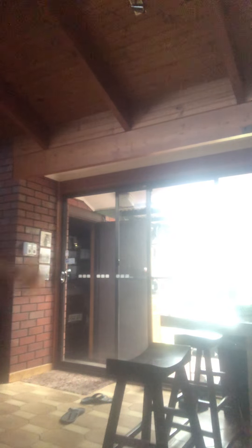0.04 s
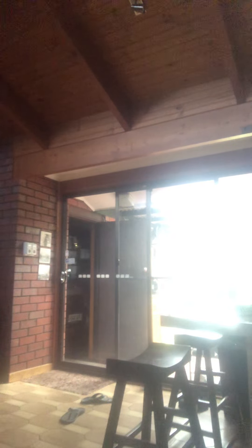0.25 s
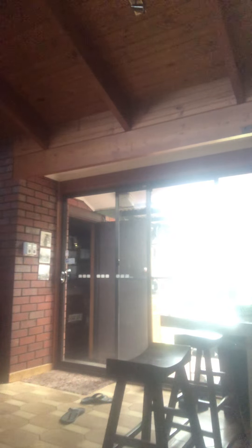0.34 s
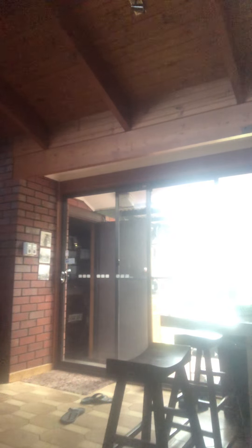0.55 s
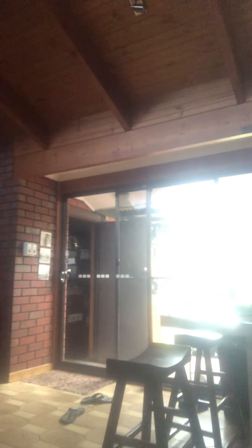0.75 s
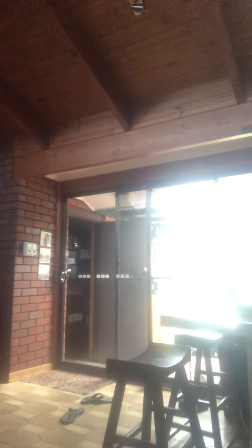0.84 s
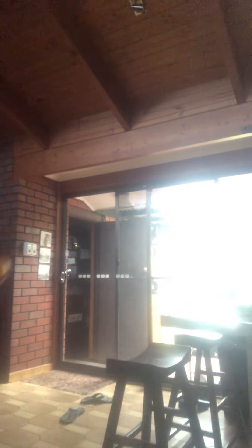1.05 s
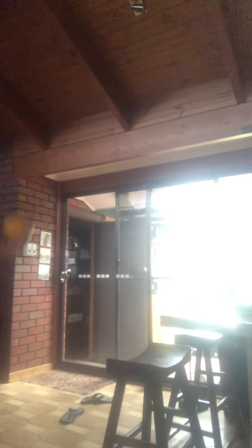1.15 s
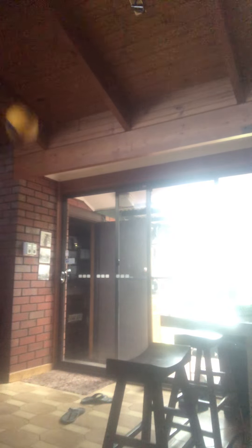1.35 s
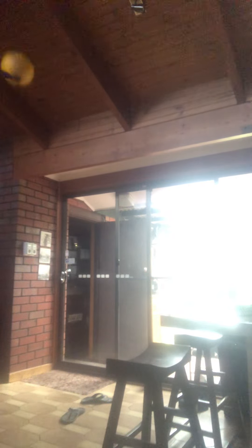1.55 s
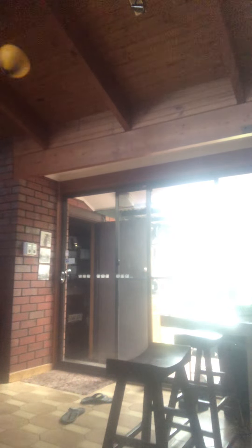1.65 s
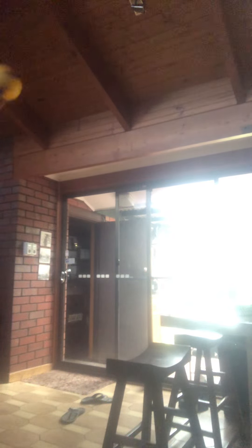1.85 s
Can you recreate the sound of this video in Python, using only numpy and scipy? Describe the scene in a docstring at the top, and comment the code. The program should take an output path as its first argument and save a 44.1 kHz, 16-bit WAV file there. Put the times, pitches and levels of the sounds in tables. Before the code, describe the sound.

A ball smacks once against a hard surface at about 0.2 seconds, over the faint tail of an earlier sound. The sharp slap has a hollow boom just behind it, and both ring through the room for about half a second. From around 0.9 seconds there is only a faint low hum and hiss, with a few barely audible swishes until about 1.4 seconds.

```python
"""Brick and timber room, tiled floor: a ball smacks once against a hard surface.
The contact gives a sharp slap with a brief buzz of the ball's skin. A hollow boom swells just
behind it; ball and room resonances and dense reflections ring for about half a second.
Around it: a low steady hum, air, faint hiss, an earlier sound dying away, tiny ticks, soft swishes."""
import sys
import numpy as np
from scipy import signal
from scipy.fft import rfft, irfft
from scipy.io import wavfile
from scipy.ndimage import uniform_filter1d

SR = 44100
rng = np.random.default_rng(int(sys.argv[2]) if len(sys.argv) > 2 else 0)


def master_out(mix):
    """Clip the mix to full scale and print it as 16-bit PCM to the path in sys.argv[1]."""
    frames = np.transpose(np.atleast_2d(mix))
    ceiling = np.clip(frames, -1, 1)
    pcm = np.round(ceiling * 32767).astype(np.int16)
    wavfile.write(sys.argv[1], SR, pcm)


N = 83790

# hum partials: f/Hz, level/dB
HUM_PARTIALS = [(48.4, -66), (86.1, -58), (172.3, -66), (258.4, -72)]
# still air: f/Hz, density/dB
AIR_SPECTRUM = [(15, -31), (25, -17.5), (60, -8), (110, 1.5), (200, -5.5), (400, -14), (700, -13.5),
                (1700, -23), (2000, -27), (3600, -30.5), (15500, -44)]
# hiss: f/Hz, density/dB
HISS_SPECTRUM = [(1000, -13), (2700, -5), (3300, -12), (3600, 5), (3900, -10.5), (5200, -6), (6500, -23),
                 (12000, -32)]
# hiss envelope: t/s, level/dB
HISS_ENVELOPE = [(0, -68.5), (.85, -68.5), (.98, -76.5), (1.12, -65.5), (1.2, -72), (1.38, -68.5),
                 (1.52, -77.5), (1.66, -75.5), (1.9, -80)]
# tail of an earlier sound: f/Hz, density/dB
TAIL_SPECTRUM = [(30, -13), (90, 4), (200, -13), (450, -12.5), (900, -26.5), (2000, -29.5), (5200, -31),
                 (7000, -46.5), (15000, -59)]
# ticks: t/s, level/dB, centre f/Hz
TICK_EVENTS = [(0.2089, -50.5, 4960), (0.2221, -56, 4830), (1.6030, -58, 4400), (1.6136, -54, 3200)]
# contact crack: f/Hz, level/dB
SLAP_SPECTRUM = [(100, -38.5), (500, -16), (1000, 2), (2500, -0.5), (3200, -5.5), (4200, 2), (5200, 7.5),
                 (6100, -7), (7300, -13), (9000, -24), (15000, -16.5)]
# first reflections of the slap: delay/s, level/dB
SLAP_ECHOES = [(.0089, -17.5), (.0120, -8.5), (.0197, -18.5), (.0277, -17), (.0404, -26.5)]
# ball and room resonances: f/Hz, level/dB
RING_MODES = [(80, -32.5), (110, -24.5), (139, -22), (168, -21.5), (224, -35), (275, -32.5), (303, -30),
              (470, -32), (501, -31.5), (585, -36), (685, -32), (792, -33), (812, -30.5), (1785, -30),
              (2600, -39), (2659, -38), (3277, -37.5), (3639, -38), (3769, -39.5), (4769, -40.5),
              (5400, -40), (5631, -39.5)]
# reverberation: f/Hz, density/dB, T60/s
REVERB_BANDS = [(30, -26.5, 0.16), (59.5, -6.5, .55), (120, 3, .62), (220, -3, 0.66), (370, -13.5, 0.78),
                (750, -13, 0.6), (1202, -17.5, 0.75), (1925, -14.5, 0.57), (3540, -13.5, 0.64),
                (5375, -15, 0.58), (6600, -23, 0.56), (10000, -32.5, 0.45), (15500, -37, .34)]
# swishes: t/s, width/s, level/dB
SWISH_EVENTS = [(.87, 0.058, -62.5), (1.2, 0.019, -60), (1.255, 0.027, -61.5), (1.32, 0.093, -64)]
# swish: f/Hz, density/dB
SWISH_SPECTRUM = [(100, -15), (300, 7.5), (900, 1.5), (1400, -5.5), (2200, -7.5), (3500, -17),
                  (5000, -14.5), (8000, -27), (15000, -32)]

HIT_S = 0.2313


def undb(db):
    """Decibels to gain."""
    return 10 ** (np.asarray(db) / 20)


def lookup(points, hz, column=1):
    """Table column interpolated over log frequency."""
    table = np.array(points, float)
    return np.interp(np.log(np.maximum(hz, 1)), np.log(table[:, 0]), table[:, column])


def noise(spectrum):
    """Coloured noise, unit RMS."""
    gain = undb(lookup(spectrum, np.fft.rfftfreq(N, 1 / SR)))
    x = irfft(rfft(rng.standard_normal(N)) * gain, N)
    return x / x.std()


def click(spectrum, size=2048):
    """Minimum-phase impulse with the given spectrum."""
    gain = undb(lookup(spectrum, np.fft.rfftfreq(size, 1 / SR)))
    cepstrum = irfft(np.log(gain))
    cepstrum[1:size // 2] *= 2
    cepstrum[size // 2 + 1:] = 0
    return irfft(np.exp(rfft(cepstrum)))


def decay(age_s, t60_s):
    """Unity until age zero, then exponential decay."""
    return np.exp(-np.log(1000) * np.maximum(age_s, 0) / t60_s)


def wander(rate_hz):
    """Slow random drift, spread near 1."""
    hold = int(SR / rate_hz)
    steps = np.repeat(rng.standard_normal(N // hold + 1), hold)
    return uniform_filter1d(steps, hold)[:N]


def hum(t, waver_db=0.5):
    """Low partials, each wavering slightly in level."""
    out = np.zeros(N)
    for hz, db in HUM_PARTIALS:
        rms = undb(db + waver_db * wander(rate_hz=3.4))
        out += rms * np.sqrt(2) * np.sin(2 * np.pi * (hz * t + rng.random()))
    return out


def air(t, level_db=-59, waver_db=0.55):
    """Still air, plus a faint hiss that comes and goes."""
    hiss_db = np.interp(t, *np.array(HISS_ENVELOPE).T)
    hiss = noise(HISS_SPECTRUM) * undb(hiss_db)
    return hiss + noise(AIR_SPECTRUM) * undb(level_db + waver_db * wander(rate_hz=5))


def earlier_tail(t, level_db=-41):
    """An earlier sound dying away."""
    return undb(level_db) * noise(TAIL_SPECTRUM) * decay(t, t60_s=1)


def ticks(t, rise_s=0.00044, skirt_db=-17):
    """Tiny dry noise bursts, each with its own brightness."""
    out = np.zeros(N)
    for at_s, db, hz in TICK_EVENTS:
        spectrum = [(hz / 8, -30), (hz / 2, skirt_db / 2), (hz, 0), (6800, skirt_db), (10000, -36)]
        attack = np.clip(1 + (t - at_s) / rise_s, 0, 1)
        out += undb(db) * noise(spectrum) * attack * decay(t - at_s, t60_s=0.008)
    return out


def slap(t, level_db=11.5, skin_db=-4):
    """Contact crack and first echoes, each with a brief buzz of the ball's skin."""
    skin = rng.standard_normal(N) * decay(t, t60_s=0.012)
    skin *= undb(skin_db) / np.linalg.norm(skin)
    skin[0] = 1  # contact impulse
    crack = signal.fftconvolve(skin, click(SLAP_SPECTRUM))
    direct = (0.00053, 0.0043)  # delay/s, level/dB
    arrivals = np.zeros(N)
    for delay_s, db in [direct, *SLAP_ECHOES]:
        arrivals[int((HIT_S + delay_s) * SR)] += undb(level_db + db)
    return signal.fftconvolve(arrivals, crack)[:N]


def boom(age_s, boom_hz=124.5, level_db=-4, peak_s=0.02072, rise_s=0.0084, fall_s=0.0083):
    """A few low cycles swell and die; ball and room modes, struck by the blow, ring on."""
    past_peak_s = age_s - peak_s
    swell = np.exp(-np.abs(past_peak_s) / np.where(past_peak_s < 0, rise_s, fall_s))
    thump = undb(level_db) * swell * np.sin(2 * np.pi * boom_hz * past_peak_s) * (age_s > 0)
    ring = np.zeros(N)
    for k, (hz, db) in enumerate(RING_MODES):
        t60_s = 0.86 * lookup(REVERB_BANDS, hz, column=2)
        polarity = (-1) ** k
        ring += polarity * undb(db) * decay(past_peak_s, t60_s) * np.sin(2 * np.pi * hz * age_s)
    return -thump - ring * np.clip(age_s / peak_s, 0, 1)


def reverb(age_s, level_db=-17.5, gap_s=0.0057, build_s=0.005, hold_s=0.027, bands=24):
    """Dense reflections build, hold briefly and decay, each band at its own rate."""
    wash = rfft(noise(REVERB_BANDS))
    centres_hz = np.geomspace(REVERB_BANDS[0][0], REVERB_BANDS[-1][0], bands)
    band_index = np.interp(np.fft.rfftfreq(N, 1 / SR), centres_hz, np.arange(bands))
    out = np.zeros(N)
    for k, hz in enumerate(centres_hz):
        triangle = np.maximum(1 - np.abs(band_index - k), 0)
        t60_s = lookup(REVERB_BANDS, hz, column=2)
        out += irfft(wash * triangle, N) * decay(age_s - hold_s, t60_s)
    return undb(level_db) * out * np.clip((age_s - gap_s) / build_s, 0, 1)


def swishes(t):
    """Soft movement: noise under Gaussian swells."""
    envelope = sum(undb(db) * np.exp(-0.5 * ((t - at_s) / width_s) ** 2)
                   for at_s, width_s, db in SWISH_EVENTS)
    return noise(SWISH_SPECTRUM) * envelope


def scene():
    """One blow and its reverberation over the quiet background, mono."""
    t = np.arange(N) / SR
    age_s = t - HIT_S
    background = hum(t) + air(t) + earlier_tail(t) + ticks(t)
    blow = slap(t) + boom(age_s) + reverb(age_s)
    return (background + blow + swishes(t))[None]


def record(dry, cutoff_hz=15800):
    """Steep elliptic low-pass."""
    return signal.sosfilt(signal.ellip(8, 0.2, 70, cutoff_hz, fs=SR, output="sos"), dry)


dry = scene()
out = record(dry)
master_out(out)
```